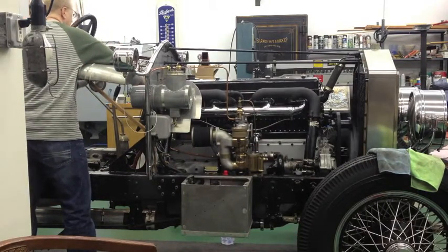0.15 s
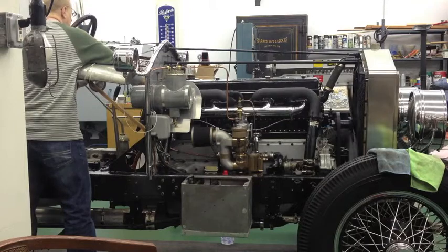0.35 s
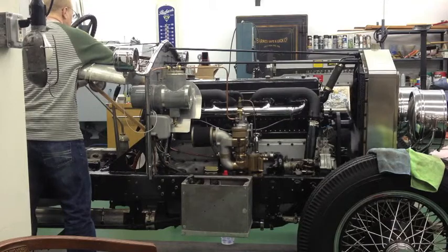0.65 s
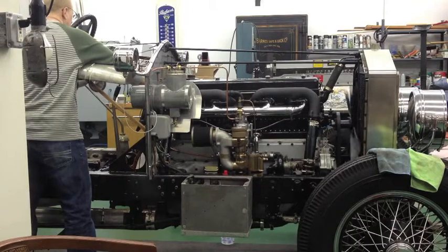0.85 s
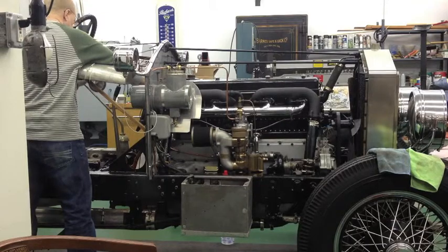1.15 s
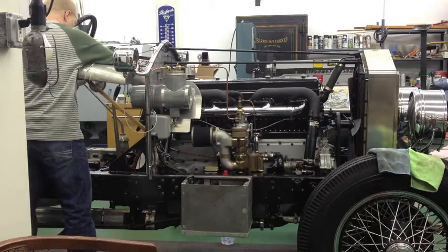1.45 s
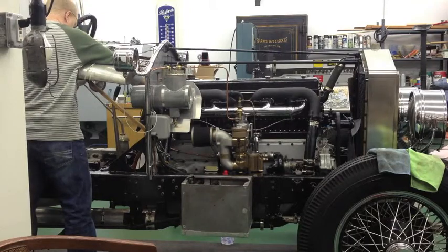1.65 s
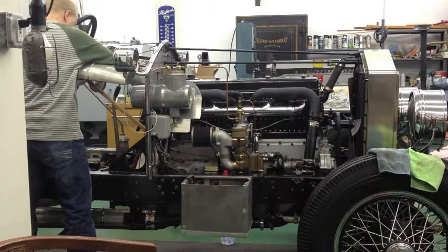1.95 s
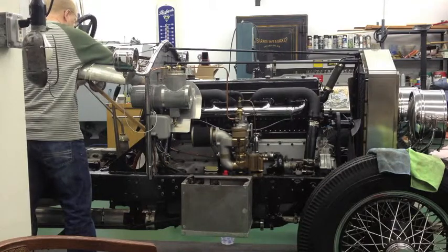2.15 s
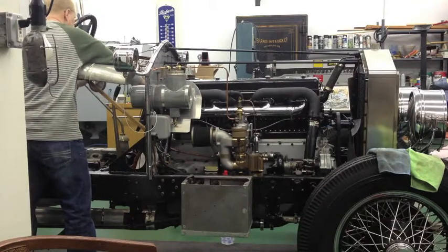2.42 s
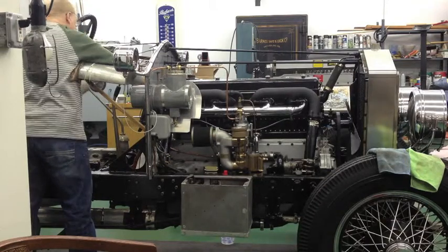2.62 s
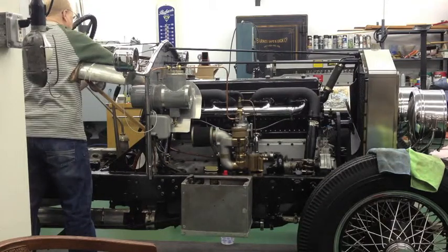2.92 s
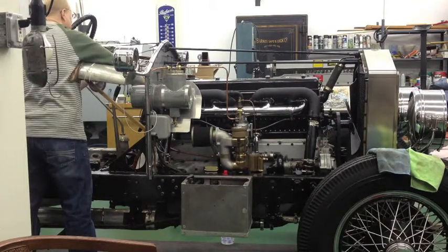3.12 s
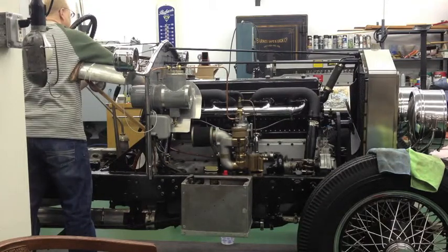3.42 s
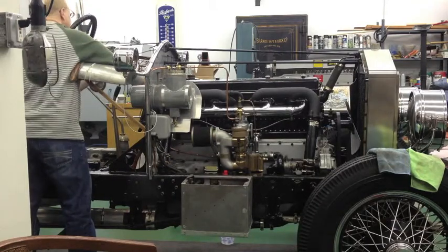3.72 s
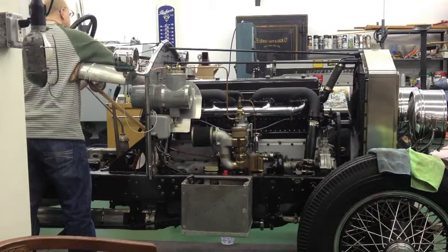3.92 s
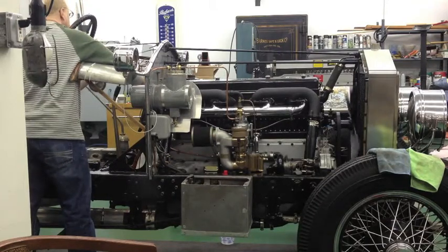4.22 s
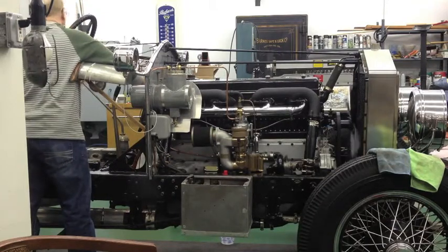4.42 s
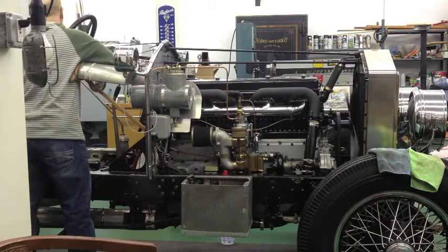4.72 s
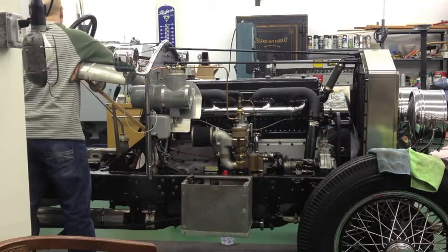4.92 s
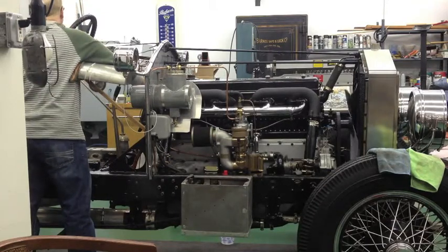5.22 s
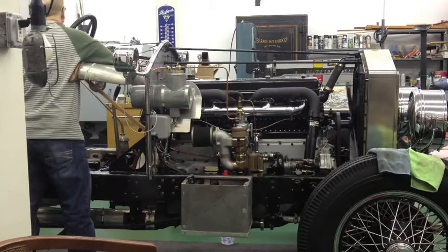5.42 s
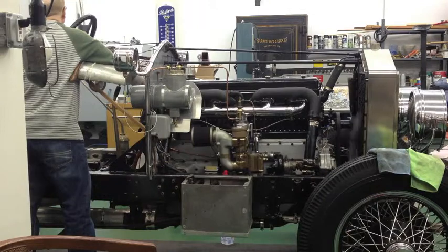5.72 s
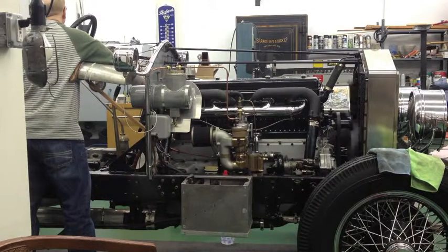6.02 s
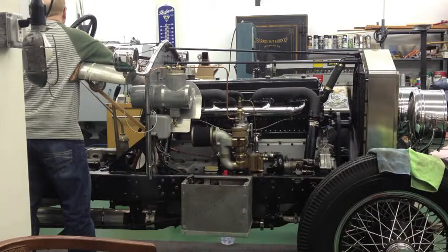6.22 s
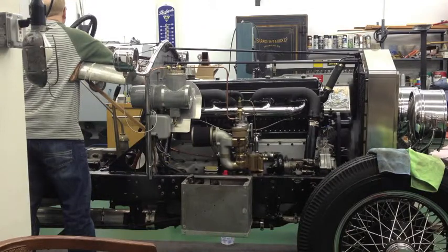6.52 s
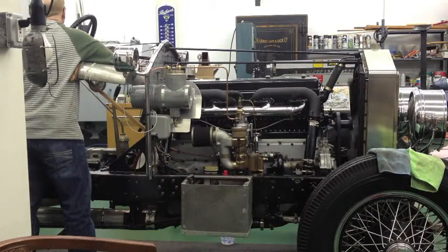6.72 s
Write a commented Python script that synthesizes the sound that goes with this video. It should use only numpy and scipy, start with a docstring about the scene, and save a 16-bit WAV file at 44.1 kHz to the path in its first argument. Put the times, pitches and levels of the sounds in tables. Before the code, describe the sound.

In a workshop, a loud bright hiss of air over a dying rumble fades within about a second, leaving faint ventilation and pulsing motor hum. A metallic clack and blunt pop cut off abruptly. After a short pause another clack starts the cranking: a grainy whirr and low growl surging unevenly, with coughs, air spits and small metallic rings, strongest near the end. One fixed microphone, same in both channels.

```python
"""An old engine is cranked by its starter: noise whirrs, and tones with loose rattle growl under load.
Before that, coloured air noise hisses into the carburettor and dies; the switch clacks, the pinion clashes.
Then the cylinders cough with short noise bursts, air spits and wheezes back and loose parts ring as tones.
Shop motors hum with beating tones over soft ventilation noise; one microphone hears it all."""
import sys
import numpy as np
from scipy import signal
from scipy.fft import rfft, irfft, next_fast_len
from scipy.io import wavfile
from scipy.ndimage import uniform_filter1d

SR = 44100
rng = np.random.default_rng(int(sys.argv[2]) if len(sys.argv) > 2 else 0)


def wav_record(signal):
    """Record a signal, one row per channel, as 16-bit PCM in the file named by sys.argv[1]."""
    frames = np.transpose(np.atleast_2d(signal))
    bounded = np.clip(frames, -1, 1)
    # unit amplitude maps onto the largest positive 16-bit level
    quanta = np.round(bounded * 32767).astype(np.int16)
    wavfile.write(sys.argv[1], SR, quanta)


N = 302526  # length in samples
T = np.arange(N) / SR  # time of each sample in seconds

# Levels in the tables are settings for the mix; record() changes the loudness of everything afterwards.
# A "fall" is the time in seconds to drop by 60 dB. A "rise" is the time in seconds to climb most of the way.

# Air refilling the intake. Each row: time in seconds, level of the shrill jet in dB.
REFILL = [(0.0, -29.5), (0.074, -32.5), (0.326, -29.5), (0.478, -30), (0.65, -35.5), (0.864, -39.5),
          (1.0, -42), (1.158, -49.5), (1.246, -61), (1.39, -85)]
# Colour of the jet, the broad rush and the rumble. Each row: frequency in Hz, relative level in dB per Hz.
JET_COLOUR = [(2940, -42), (5000, -17.5), (6120, -15), (6360, -6.5), (7080, 0), (7860, -4), (8080, -8),
              (8670, -7), (9390, -12), (10000, -12.5), (12200, -5), (14600, -8), (15400, -4.5)]
RUSH_COLOUR = [(710, -37), (1200, -9.5), (1470, -10.5), (1980, -4.5), (3690, -5.5), (4200, 3.5), (4740, 2),
               (5280, -7), (6000, 2), (7800, -22), (13200, -120)]
RUMBLE_COLOUR = [(35, -43.5), (60, -24), (291, -5.5), (457, -8), (553, -3.5), (811, -7), (884, -8),
                 (1300, -6), (3800, -9), (4940, -39.5), (8360, -120)]
RUSH_DB, RUSH_UNDER_JET_DB = -48.5, -6  # the rush holds its level until the jet sinks close to it
# The rumble of the last try dies in two stages. Each row: level in dB, fall in seconds.
LAST_TRY = [(-36, 0.39), (-45.5, 3.2)]

# Colour of the shop's ventilation. Each row: frequency in Hz, relative level in dB per Hz.
SHOP_COLOUR = [(25, -42.5), (100, -13.5), (160, 3), (210, -1), (330, -3.5), (420, -3.5), (700, -8.5),
               (900, -12.5), (1800, -18), (4600, -26), (5400, -22.5), (6000, -27.5), (8000, -30),
               (10000, -36), (13000, -29.5), (15000, -31.5), (15400, -32.5)]
SHOP_DB = -67
# Motor hum. Each row: frequency in Hz, level in dB, depth of beating from 0 to 1.
HUM = [(177.6, -81, .3), (237.6, -66.5, .8), (349, -73, 0.2), (463, -75, 0.5), (694.4, -82, 0.5),
       (1798, -85, .2)]
# Two motors drift in and out of step. The row: beats per second, one loud moment in seconds.
BEAT = (5.15, 1.146)

# The starter's plunger strikes. Each row: start in seconds, level in dB, fall of the clatter in seconds,
# dullness in dB per octave.
CLACKS = [(2.46, -49, 0.22, 5), (2.494, -25, 0.15, -3), (3.535, -45, 0.09, 14), (3.568, -23.5, 0.19, -3.5),
          (5.169, -28.5, 0.11, -0.5)]
# The pinion is thrown out. Each row: start in seconds, level in dB, fall of the clatter in seconds,
# dullness in dB per octave.
KICKS = [(4.677, -24, 0.13, 0.011), (4.704, -29, 0.15, 0)]
# What rings in the plunger and the pinion. Each row: frequency in Hz, width in Hz, relative level in dB.
PLUNGER = [(795, 8.4, -15.5), (917, 14.3, -16), (1269, 26, -4.5), (1417, 20, -6.5), (2066, 45, 0),
           (2180, 54, -2), (2670, 48, -18), (2750, 25, -14.5), (3130, 38, -15), (3710, 60, -16),
           (4200, 57, -13.5)]
PINION = [(566, 38, -5), (825, 21, 1.5), (1278, 27, 3.5), (1347, 33, -5), (1747, 38, -5.5), (2720, 27, -6)]
# Colour of the case's clatter. Each row: frequency in Hz, relative level in dB per Hz.
CASE_COLOUR = [(300, -62), (600, -4.5), (1300, 5.5), (3500, -2), (6000, -15.5), (9000, -23.5), (15400, -27)]
# Struck sounds, puffs and their echoes are silent in this gap. The row: from seconds, to seconds.
HUSH = (2.68, 3.5)
# How fast the room's answer dies. Each row: frequency in Hz, fall in seconds.
WALLS = [(150, 1), (1000, 0.43), (5000, 0.33), (14000, 0.53)]

# Blows and coughs. Each row: start in seconds, level in dB, extra treble in dB, extra bass in dB,
# rise of the body in seconds, fall of the body in seconds.
BLOWS = [(2.5387, -22.5, -7.5, -2.5, 0.0028, 0.18), (3.89, -45, -22, -10, 0.001, 0.12),
         (3.934, -44, -21, 6, 0.001, 0.1695), (4.3007, -41.5, -18, 0, 0.00079, 0.203),
         (5.228, -26, -8, -7, 0.0015, 0.22), (5.411, -38.5, -20.5, 3.5, 0.001, 0.22),
         (5.649, -32.5, -11, -3, 0.00201, 0.11), (5.8327, -36.5, -11.5, -2, 0.0014, 0.18),
         (6.4259, -19, -7, -4.5, 0.0016, 0.14), (6.6353, -17, -6, -6.5, 0.00097, 0.15)]
# Colour of a blow's body, treble and bass. Each row: frequency in Hz, relative level in dB per Hz.
BODY_COLOUR = [(590, -51), (1000, 1), (2310, -2), (2610, -5.5), (3050, 1.5), (5440, -13), (7000, -11.5),
               (9100, -37), (15400, -120)]
FIZZ_COLOUR = [(2940, -31), (5000, -1), (5260, -11), (6380, -1), (8770, -7), (9760, -7.5), (15300, -19)]
THUD_COLOUR = [(59, -59), (100, -35), (144, -9), (335, -8), (524, -4.5), (684, -5), (903, -16),
               (1080, -9.5), (1800, -22), (2340, -46), (3960, -120)]

# The starter slows against each compression and runs up after it. Each row: time in seconds,
# gear teeth per second, whirr level in dB.
STARTER = [(3.56, 400, -69), (3.61, 431, -53.5), (3.76, 746, -46), (3.86, 640, -54.5), (3.94, 570, -48.5),
           (4.06, 710, -48.5), (4.17, 690, -54.5), (4.28, 551, -51.5), (4.5, 773, -44.5),
           (4.58, 650, -47.5), (4.72, 580, -52), (5.03, 602, -54), (5.14, 600, -57.5), (5.29, 680, -48),
           (5.38, 580, -55), (5.5, 667, -48), (5.58, 720, -50), (5.68, 702.6, -47), (5.94, 638, -46),
           (6.08, 690, -48), (6.2, 660, -50.5), (6.27, 637, -47), (6.34, 620, -49.5), (6.41, 620, -44),
           (6.6, 600, -45.5), (6.86, 600, -46)]
# Colour of the whirr and the intake air. Each row: frequency in Hz, relative level in dB per Hz.
WHIRR_COLOUR = [(410, -17.5), (700, -3.5), (867, -3.5), (1240, -1.5), (1490, -4), (2020, -1), (2380, -0.5),
                (2530, -5.5), (2830, -5.5), (3920, -2.5), (5890, -14.5), (6730, -16.5), (8000, -26),
                (10400, -46), (17600, -120)]
AIR_COLOUR = [(2650, -34), (4500, 0), (5220, -10), (8650, -9), (9490, -16), (11700, -11), (14600, -21.5),
              (15400, -21)]
AIR_DB, AIR_GROWS = -56.5, 1.8  # intake air at a whirr of -47 dB; its dB change for each dB of whirr
# The starter's own resonances. Each row: frequency in Hz, width in Hz, relative level in dB.
WHINE = [(2554, 45, 1.5), (3036, 35, -3), (3945, 55, -5)]
# Parts shaken by the gear teeth. Each row: frequency in Hz, width in Hz, relative level in dB.
HOUSING = [(322, 24, 8), (351, 23, 0)]
CHASSIS = [(158, 42, 1.5), (202.4, 45, 0), (251, 35, -2)]
FLYWHEEL = [(564, 57, 4.5), (699.5, 31, 7.5), (817, 160, -3)]
HOUSING_HZ = 332.8  # pitch of the housing's tone
# The gears groan under load. Each row: start of the hold in seconds, time held in seconds,
# housing level in dB, chassis level in dB, flywheel level in dB, chassis pitch in Hz.
GROANS = [(3.65, .01, -74, -58, -53.5, 215), (3.79, 0.039, -42, -44, -48, 211.3),
          (3.885, 0.022, -44, -47.5, -54, 199.6), (4.1, 0.035, -41, -46.5, -46.5, 199.6),
          (4.19, .03, -46, -46.5, -51, 215.8), (4.25, .03, -59, -44, -50, 248),
          (4.31, .04, -48, -40, -48, 280), (4.552, 0.032, -38.5, -51, -49.5, 206.1),
          (4.65, .06, -47.5, -57, -50.5, 210), (5.28, 0.049, -44.5, -49, -47, 212),
          (5.37, 0.029, -44, -48.5, -60, 204.9), (5.46, 0.016, -53, -57, -57, 230.5),
          (5.67, 0.085, -64, -60, -50, 229.7), (5.755, 0.0095, -47, -52, -49.5, 227.3),
          (6.01, 0.039, -38.5, -53.5, -49.5, 218.9), (6.111, .02, -46.5, -59, -54.5, 219.3),
          (6.26, 0.013, -61, -58, -59, 226.1), (6.45, 0.041, -45.5, -54, -46.5, 237.7),
          (6.669, 0.016, -37.5, -57, -44.5, 237.6), (6.76, 0.021, -48.5, -60, -67, 229.3)]
SWELL_DB_PER_S, EASE_DB_PER_S = 350, 210  # how fast a groan comes and goes
# Level between groans, following the whirr. The row: housing, chassis, flywheel, each in dB over the whirr.
IDLE_DB = (-11.5, -13, -14)
# Loose rattle beside the tone. The row: housing, chassis, flywheel, each as a share before levelling.
ROUGH = (.55, .6, .75)

# A loose part rings. Each row: start in seconds, pitch in Hz, level in dB, fall in seconds.
PINGS = [(4.27, 1042, -37.5, 0.11), (5.22, 1050, -42.5, 0.21), (5.68, 1216, -40.5, 0.18),
         (5.981, 1280, -43, 0.29), (6.24, 970, -41, 0.24), (6.411, 966, -40, 0.21), (6.54, 970, -43, 0.16),
         (6.78, 975, -50, 0.33)]

# Air spits or wheezes back through the carburettor. Each row: start in seconds, level in dB,
# rise of the broad noise in seconds, its fall in seconds, extra level of the shrill edge in dB.
PUFFS = [(4.6693, -31, 0.001, 0.087, -4), (4.6892, -37, 0.00198, 0.13, -4), (4.72, -44.5, 0.03, 1.4, -21),
         (5.7644, -32.5, 0.0079, 0.16, -11.5), (6.2158, -30, 0.0073, 0.18, -12),
         (6.3714, -19, 0.005, 0.24, -25.5), (6.4994, -32, 0.002, 0.16, -10),
         (6.7635, -30.5, 0.002, 0.14, -11.5)]
# Colour of the broad and the shrill part. Each row: frequency in Hz, relative level in dB per Hz.
SPIT_COLOUR = [(1760, -30), (3000, -4), (4100, -1.5), (4390, -3.5), (5000, 2), (6140, -8), (6800, -2.5),
               (9240, -8), (11700, -8.5), (15300, -14)]
SHRILL_COLOUR = [(3240, -31.5), (5500, -7), (6360, 1), (7080, -5), (7880, -4), (10000, -5.5), (15300, -5.5)]

# The overall level, with a brief dip. Each row: time in seconds, gain in dB.
FADE = [(2.56, 7.5), (2.62, 8), (2.66, -1.5), (2.68, -32), (2.695, -6), (2.72, 1), (2.78, 7)]
TOP_HZ = 15400  # the sound is cut off from here up


def amp(db):
    """Turn decibels into gain."""
    return 10 ** (np.asarray(db) / 20)


def unit(x):
    """Scale a sound to an average (rms) strength of 1."""
    return x / np.sqrt(np.mean(x ** 2) + 1e-20)


def along(points, hz):
    """Read a value between (frequency, value) points, spacing the frequencies as the ear does."""
    f, v = np.transpose(points)
    return np.interp(np.log(hz + 1), np.log(f + 1), v)


def curves(rows):
    """Draw straight lines between rows: one value per sample for each column after the time."""
    s, *columns = np.transpose(rows)
    return [np.interp(T, s, column) for column in columns]


def filtered(x, response):
    """Multiply each frequency of a sound by a response."""
    m = next_fast_len(N + SR // 2)  # spare room so that ringing does not wrap to the start
    return irfft(rfft(x, m) * response(np.fft.rfftfreq(m, 1 / SR)), m)[..., :N]


def resonant(modes):
    """Response of a part that rings at several frequencies, with alternating signs."""
    def response(f):
        total = 0
        for k, (centre, width, db) in enumerate(modes):
            ring = 1j * f * width / (centre * centre - f * f + 1j * f * width)
            total = total + (-1) ** k * amp(db) * ring
        return total
    return response


def noise(spectrum, patchy_db):
    """Coloured noise of strength 1, made uneven by random patches in time and frequency."""
    z = signal.stft(rng.standard_normal(N), nperseg=512)[2]
    field = uniform_filter1d(rng.standard_normal(z.shape), size=5, axis=0)
    field = uniform_filter1d(field, size=8, axis=1)
    x = signal.istft(z * amp(patchy_db * unit(field)), nperseg=512)[1][:N]
    return unit(filtered(x, lambda hz: amp(along(spectrum, hz))))


def bursts(rows):
    """Add up loudness shapes that rise and die, from (start, dB, rise, fall); each is cut at half a second."""
    out = np.zeros(N + SR)
    t = T[:SR // 2]
    for s, db, rise, fall in rows:
        shape = (1 - np.exp(-t / max(rise, 1e-4))) * amp(db - 60 * t / fall)
        out[round(s * SR):][:len(t)] += shape
    return out[:N]


def refill():
    """Air jets past the throttle into the emptied manifold while the last try dies away."""
    jet_db, = curves(REFILL)
    rush = amp(np.minimum(RUSH_DB, jet_db + RUSH_UNDER_JET_DB))
    dying = sum(amp(db - 60 * T / fall) for db, fall in LAST_TRY)
    rumble = np.minimum(dying, amp(jet_db))  # never louder than the jet's setting
    air = amp(jet_db) * noise(JET_COLOUR, patchy_db=2.0)
    air = air + rush * noise(RUSH_COLOUR, patchy_db=1.2)
    air = air + rumble * noise(RUMBLE_COLOUR, patchy_db=2)
    return air * (T < REFILL[-1][0])


def shop():
    """Far ventilation is steady noise; motors hum as tones that swell and sink together."""
    rate, loud = BEAT
    beat = np.cos(2 * np.pi * rate * (T - loud))
    hum = 0
    for hz, db, depth in HUM:
        tone = np.sin(2 * np.pi * (hz * T + rng.random()))
        hum = hum + amp(db) * (1 + depth * beat) * tone
    return amp(SHOP_DB) * noise(SHOP_COLOUR, patchy_db=1.1) + hum


def strikes(events, modes):
    """Each strike rings a part's resonances; a dull strike favours the low ones."""
    ring, t = np.zeros(N + SR), T[:SR // 4]
    for s, db, _, dull_db in events:
        for hz, width, level in modes:
            tilt_db = dull_db * np.log2(hz / 1300)
            size = amp(db - 8.0 + level - tilt_db + rng.normal(0, 2.1))
            rise = 1 - np.exp(-t / 0.0057)  # the contact slides home over a few ms
            swell = rise * np.exp(-np.pi * width * t)  # wide resonances die sooner
            ring[round(s * SR):][:len(t)] += size * swell * np.sin(2 * np.pi * (hz * t + rng.random()))
    return ring[:N]


def clacks():
    """The switch plunger and the pinion ring over the noisy clatter of the starter's case."""
    shape = bursts([(s, db - 16, .001, fall) for s, db, fall, _ in CLACKS + KICKS])
    clatter = shape * noise(CASE_COLOUR, patchy_db=3.5)
    return strikes(CLACKS, PLUNGER) + strikes(KICKS, PINION) + clatter


def walls(x):
    """The room answers with a noise tail in which each frequency dies at its own speed."""
    hz, t, z = signal.stft(rng.standard_normal(SR // 2), SR, nperseg=256)
    tail = signal.istft(z * amp(-60 * t / along(WALLS, hz)[:, None]), SR, nperseg=256)[1]
    late = np.pad(x, (300, 0))  # the answer comes 300 samples late
    return signal.fftconvolve(late, tail / np.linalg.norm(tail))[:N]


def blows():
    """A crack, then noise: the treble dies sooner, the bass swells late and lasts longer."""
    crack = bursts([(s, db - 12.5, .0002, .012) for s, db, *_ in BLOWS])
    body = bursts([(s, db - 15, rise, fall) for s, db, _, _, rise, fall in BLOWS])
    fizz = bursts([(s, db + treble - 10.5, rise, 0.57 * fall) for s, db, treble, _, rise, fall in BLOWS])
    thud = bursts([(s, db + bass - 14.0, 3 * rise, 1.45 * fall) for s, db, _, bass, rise, fall in BLOWS])
    sound = (crack + body) * noise(BODY_COLOUR, patchy_db=0.0)
    sound = sound + fizz * noise(FIZZ_COLOUR, patchy_db=0.5)
    return sound + thud * noise(THUD_COLOUR, patchy_db=3.5)


def rattle(per_s, spread_db):
    """Loose parts knock at random moments, with random direction and size."""
    knocks = rng.random(N) < per_s / SR
    return knocks * rng.choice([-1, 1], N) * amp(spread_db * rng.standard_normal(N))


def wavering(hz, scatter):
    """The phase of a tone that wanders at random around its pitch."""
    wander = scatter * uniform_filter1d(rng.standard_normal(N), size=200)
    return np.cumsum(2 * np.pi * hz / SR + wander)


def groans():
    """The load on housing, chassis and flywheel: each groan swells, holds and eases."""
    loads = np.zeros((3, N))
    for s, held, *levels_db, _ in GROANS:
        before, after = np.maximum(s - T, 0), np.maximum(T - s - held, 0)
        shape_db = -SWELL_DB_PER_S * before - EASE_DB_PER_S * after
        loads = np.maximum(loads, amp(np.array(levels_db))[:, None] * amp(shape_db))
    return loads


def shaken(part):
    """Random knocks ring one part, pass a wide resonance near 420 Hz and lose their deep bass."""
    def response(f):
        bass_cut = (1j * f / (90 + 1j * f)) ** 4
        return resonant(part)(f) * resonant([(420, 350, 0)])(f) * bass_cut
    return unit(filtered(rattle(per_s=500, spread_db=3.5), response))


def cranking():
    """Brushes and gears whirr, the intake sucks, and loaded teeth shake three resonant parts."""
    teeth_hz, whirr_db = curves(STARTER)
    chassis_hz, = curves([(s + held / 2, hz) for s, held, *_, hz in GROANS])
    parts, pitches = (HOUSING, CHASSIS, FLYWHEEL), (HOUSING_HZ, chassis_hz, teeth_hz)
    growl = 0
    for load, idle_db, share, part, hz in zip(groans(), IDLE_DB, ROUGH, parts, pitches):
        tone = np.sin(wavering(hz, scatter=.047))
        level = np.hypot(load, amp(whirr_db + idle_db))
        growl = growl + level * unit(tone + share * shaken(part))
    chatter = unit(filtered(rattle(per_s=310, spread_db=3.5), resonant(WHINE)))
    whirr = amp(whirr_db) * unit(noise(WHIRR_COLOUR, patchy_db=2.0) + 0.36 * chatter)
    air_db = AIR_DB + AIR_GROWS * (whirr_db + 47)  # swings wider than the whirr
    air = amp(air_db) * noise(AIR_COLOUR, patchy_db=1.2)
    return (whirr + air + growl) * (T > STARTER[0][0])


def pings():
    """A loose part rings as one slightly unsteady tone that fades."""
    s, hz = np.transpose(PINGS)[:2]
    latest = np.clip(np.searchsorted(s, T) - 1, 0, None)  # which ring began last
    shape = bursts([(s, db, .008, fall) for s, _, db, fall in PINGS])
    return shape * np.sin(wavering(hz[latest], scatter=0.0288))


def puffs():
    """Short spits and one longer wheeze of air make broad noise; a narrow gap adds a shrill edge."""
    broad = bursts([(s, db - 12.5, rise, fall) for s, db, rise, fall, _ in PUFFS])
    edge = bursts([(s, db + shrill, .5 * rise, .5 * fall) for s, db, rise, fall, shrill in PUFFS])
    return broad * noise(SPIT_COLOUR, patchy_db=2) + edge * noise(SHRILL_COLOUR, patchy_db=5.0)


def scene():
    """Add all sources; one microphone feeds both channels."""
    hits = clacks() + blows() + pings() + puffs()
    outside_hush = (T < HUSH[0]) | (T > HUSH[1])
    heard = (hits + amp(-4.5) * walls(hits)) * outside_hush
    mono = refill() + shop() + heard + cranking()
    return np.array([mono, mono])


def record(dry):
    """The level dips briefly after the first clash; the microphone cuts the bass; the sound stops at TOP_HZ."""
    gain_db, = curves(FADE)

    def response(hz):
        bass_cut = (1j * hz / (110 + 1j * hz)) ** 2
        return bass_cut * (hz < TOP_HZ)
    return filtered(dry * amp(gain_db), response)


dry = scene()
out = record(dry)
wav_record(out)
```